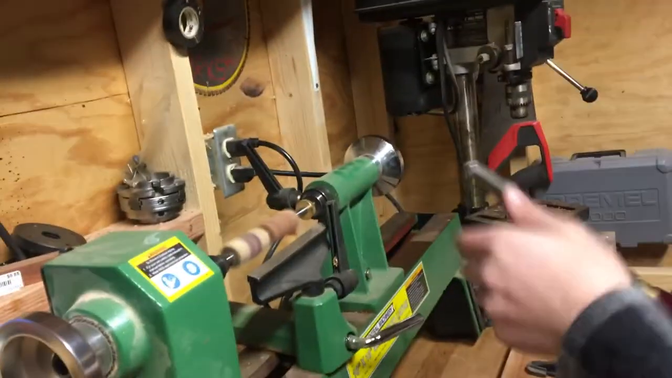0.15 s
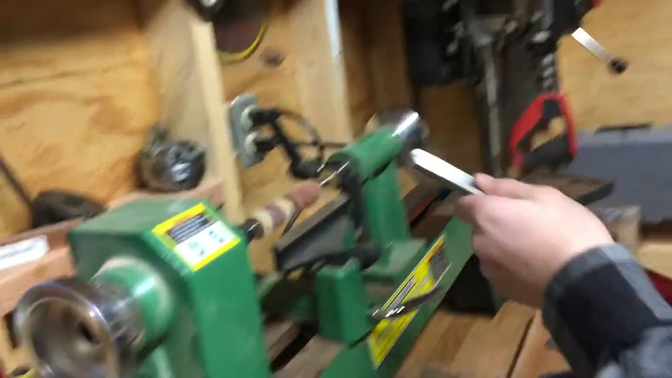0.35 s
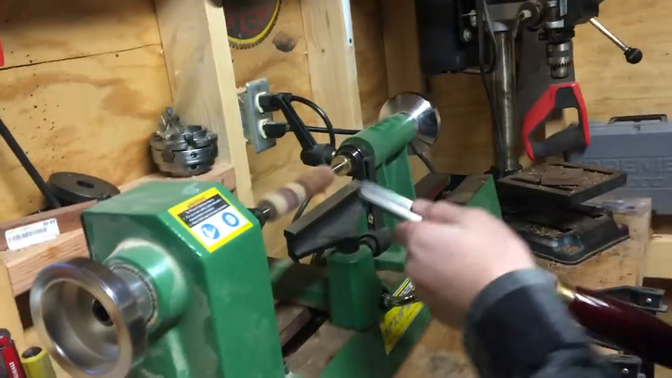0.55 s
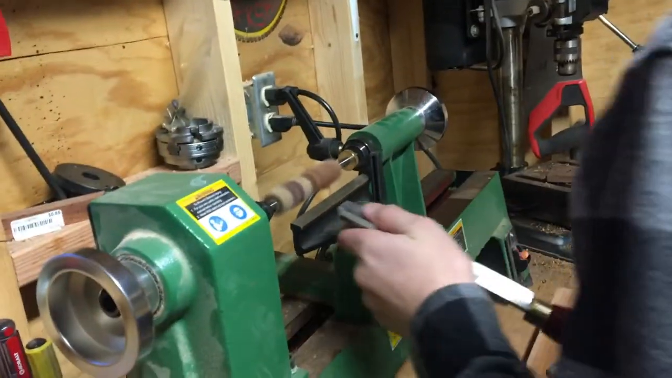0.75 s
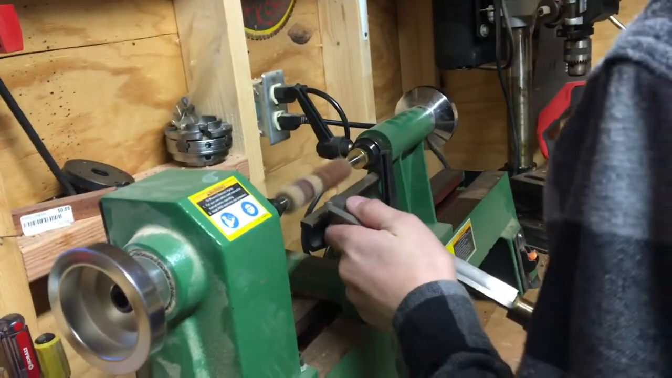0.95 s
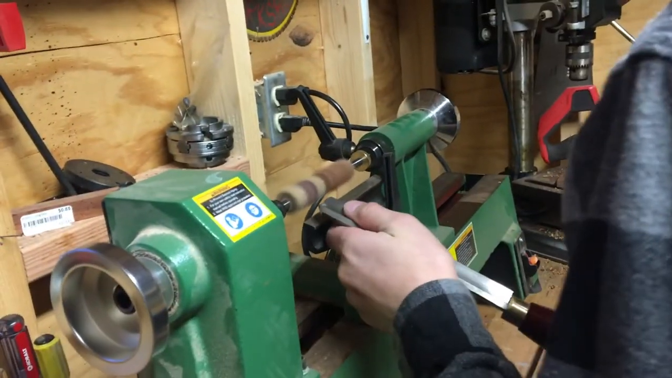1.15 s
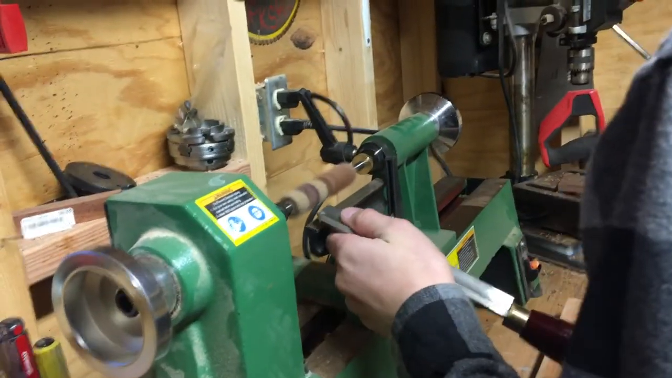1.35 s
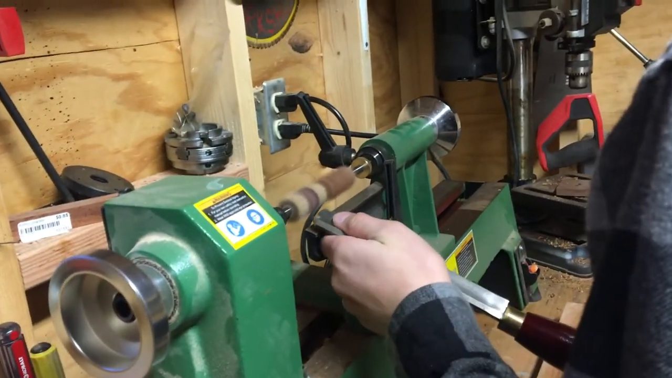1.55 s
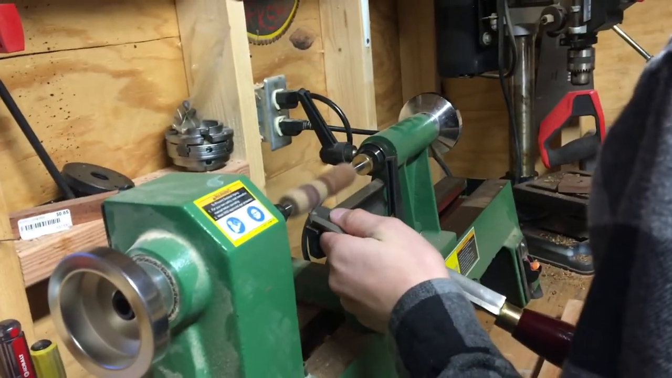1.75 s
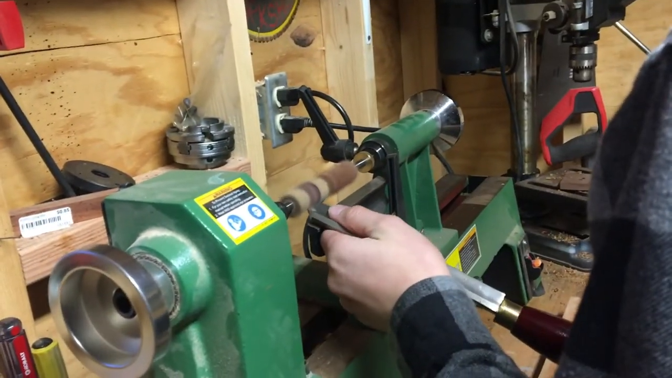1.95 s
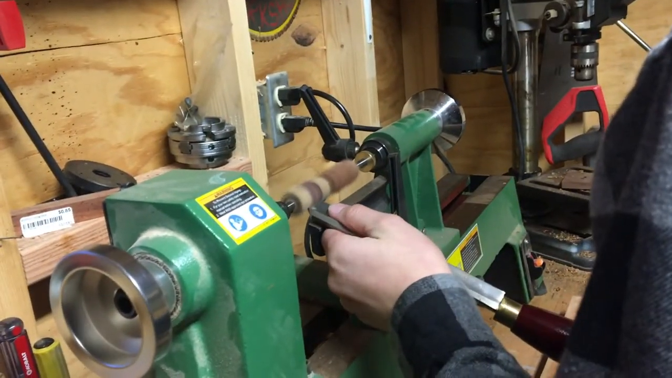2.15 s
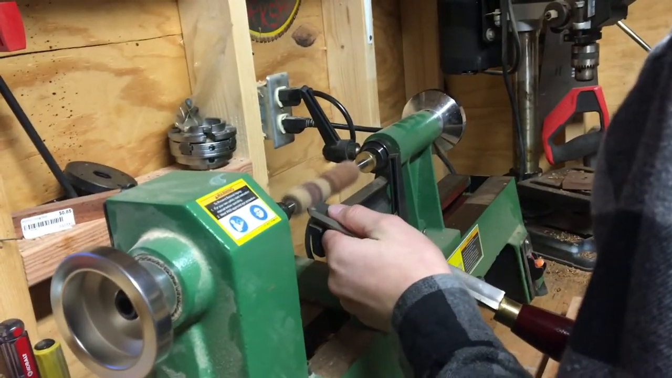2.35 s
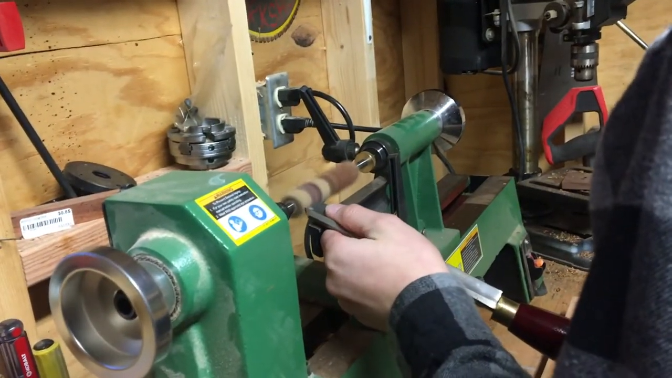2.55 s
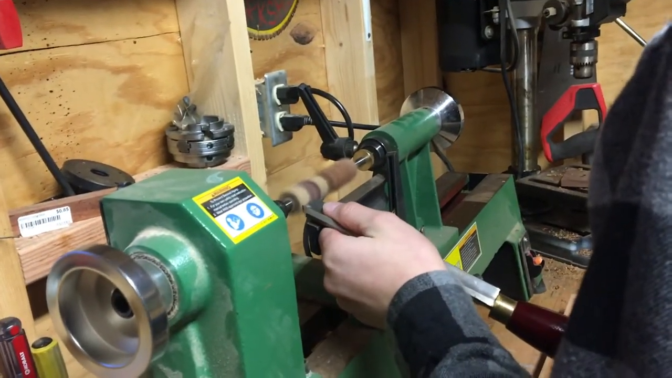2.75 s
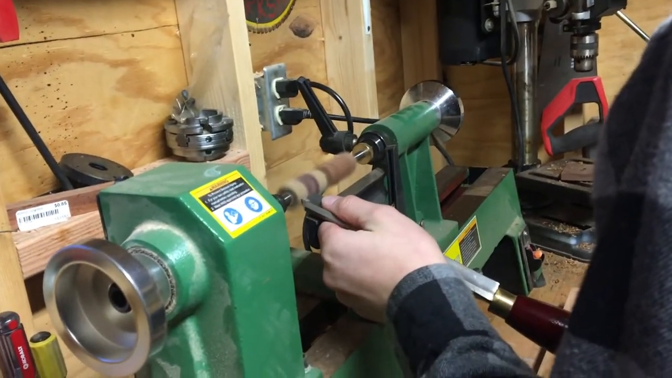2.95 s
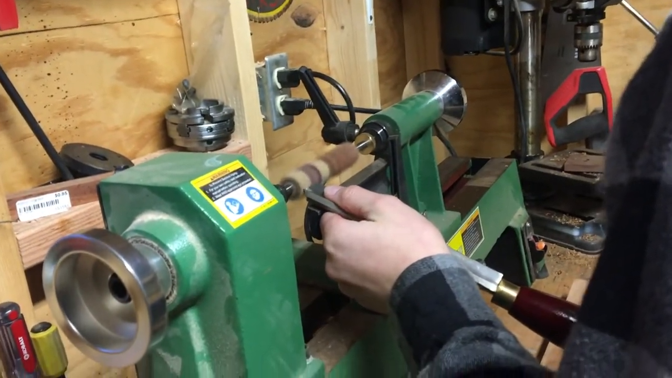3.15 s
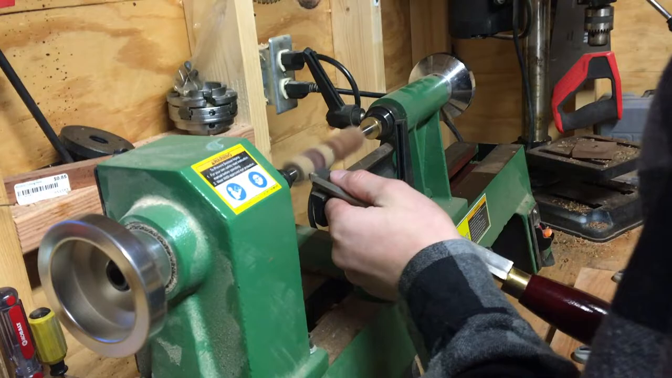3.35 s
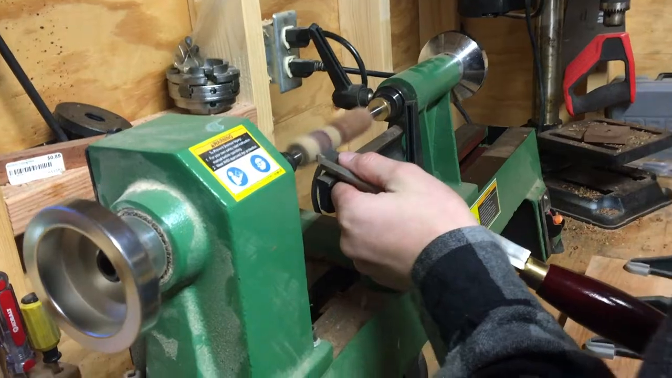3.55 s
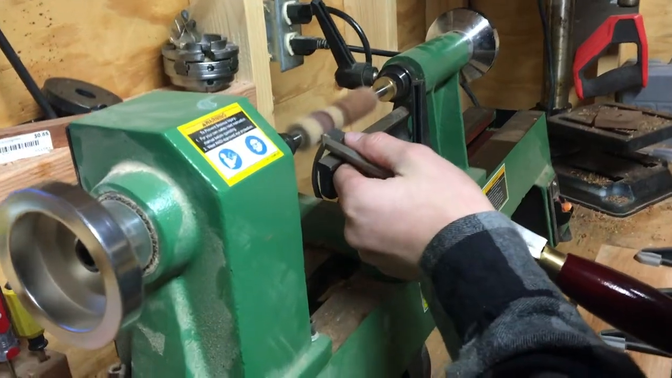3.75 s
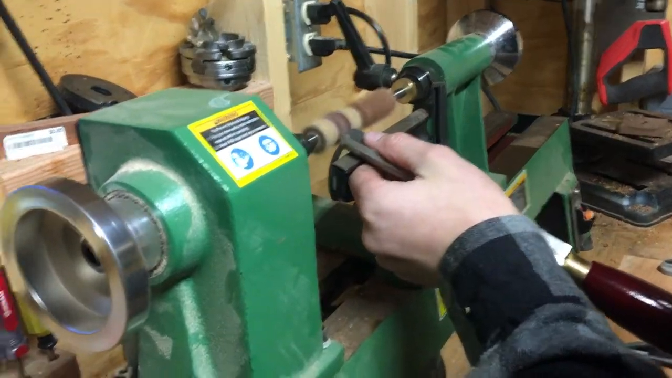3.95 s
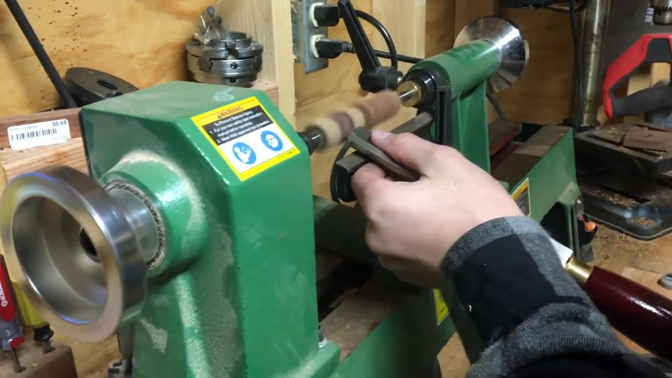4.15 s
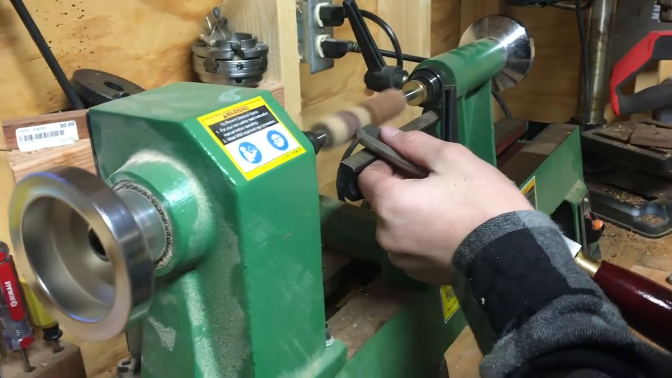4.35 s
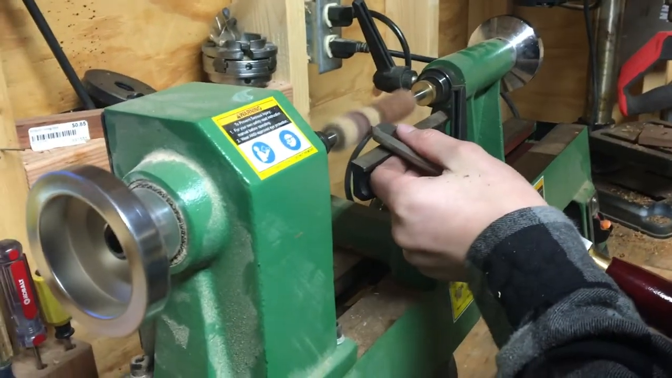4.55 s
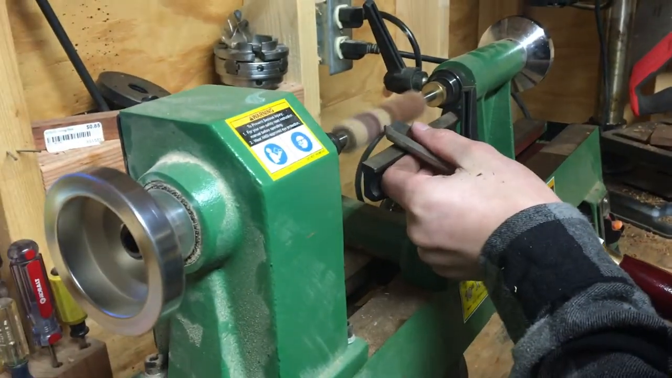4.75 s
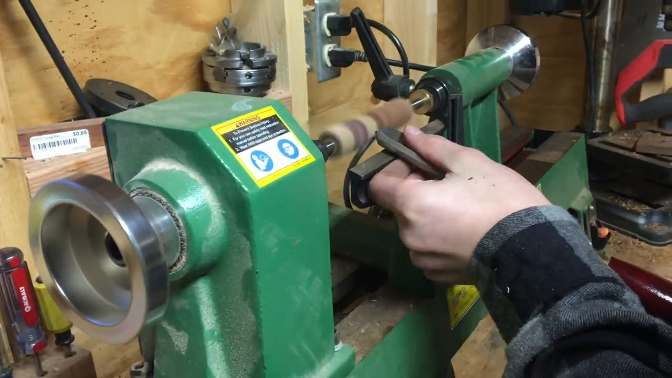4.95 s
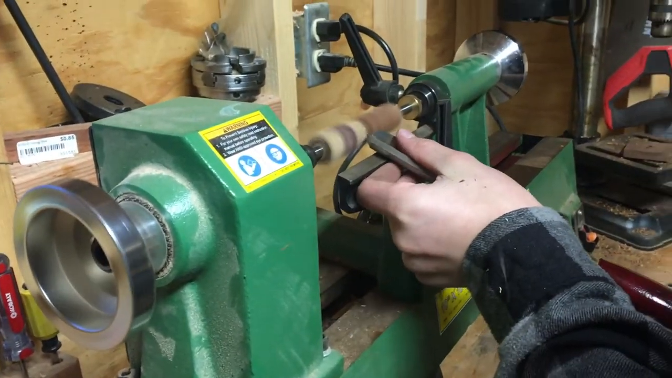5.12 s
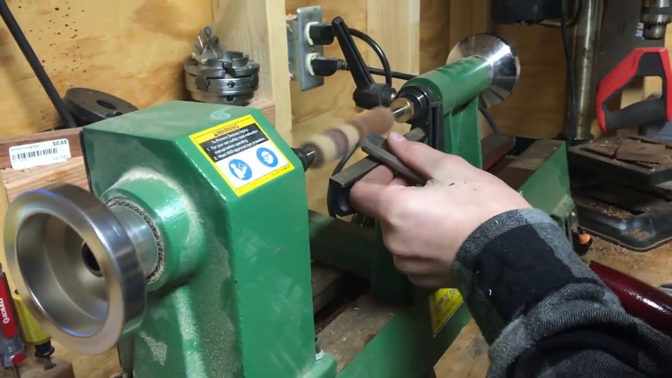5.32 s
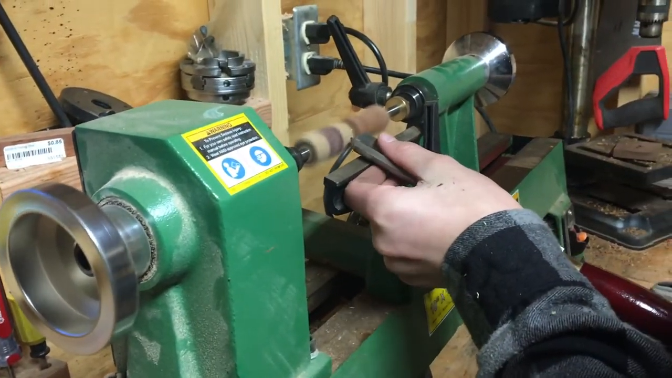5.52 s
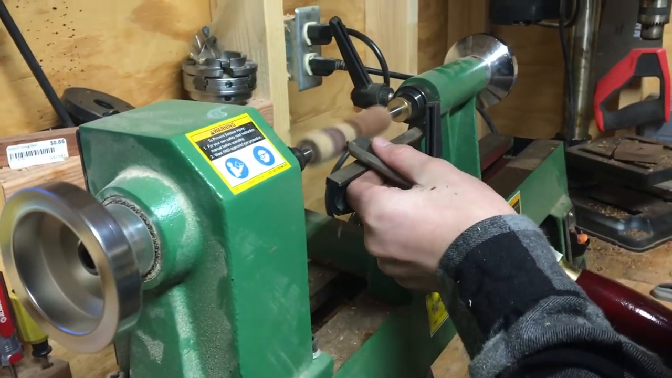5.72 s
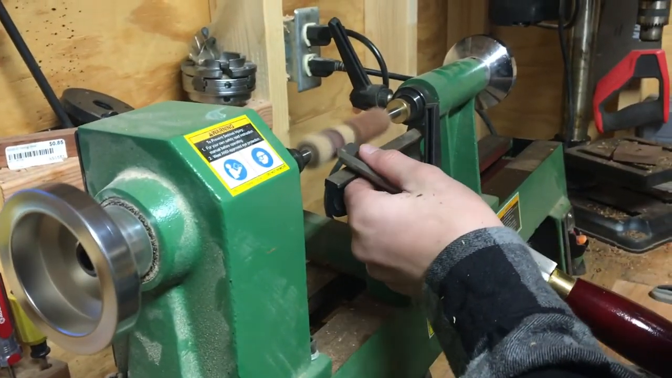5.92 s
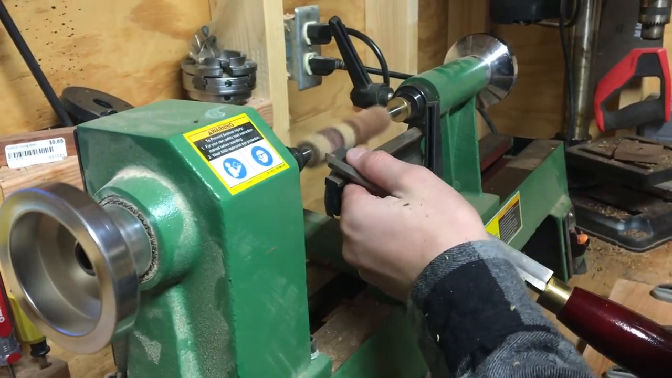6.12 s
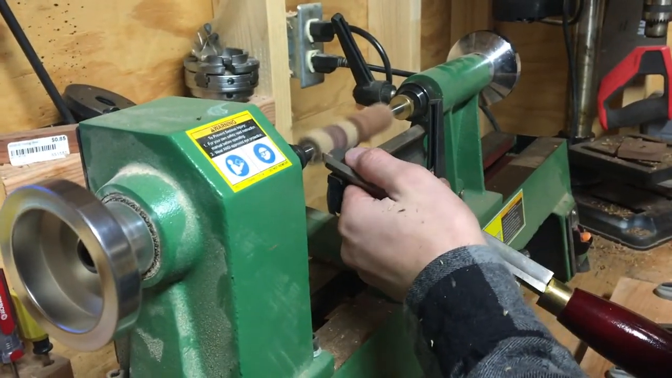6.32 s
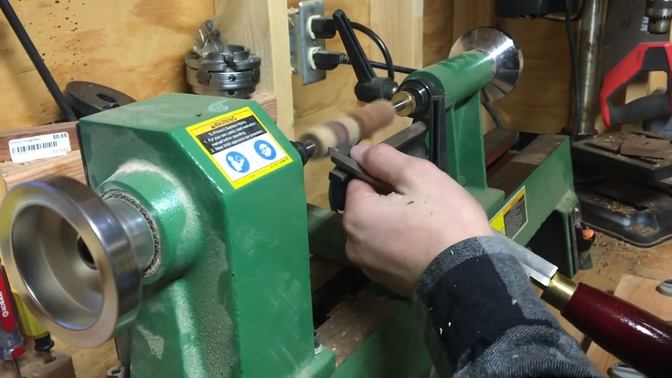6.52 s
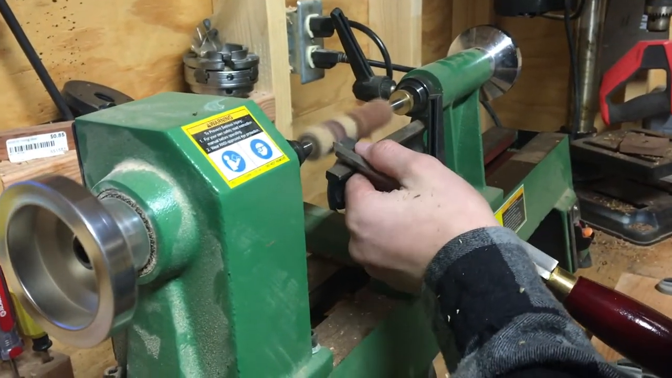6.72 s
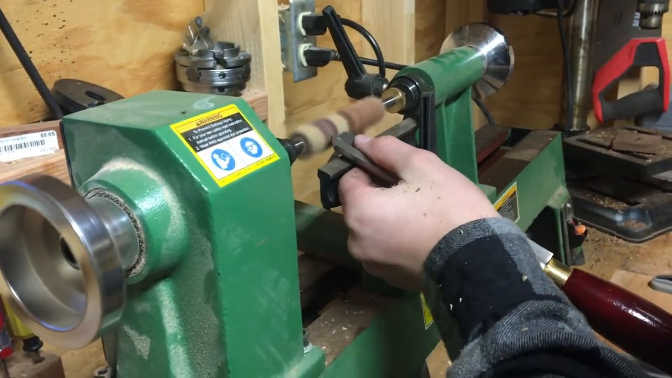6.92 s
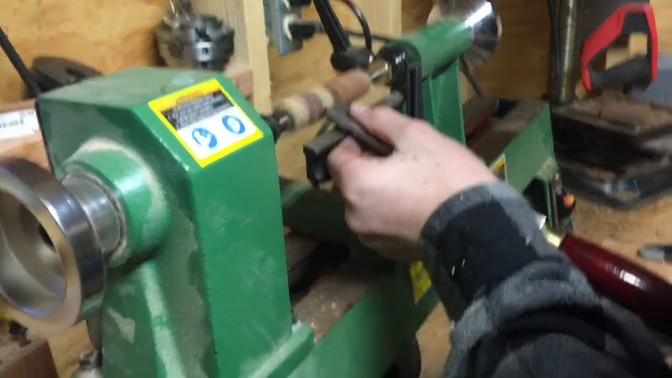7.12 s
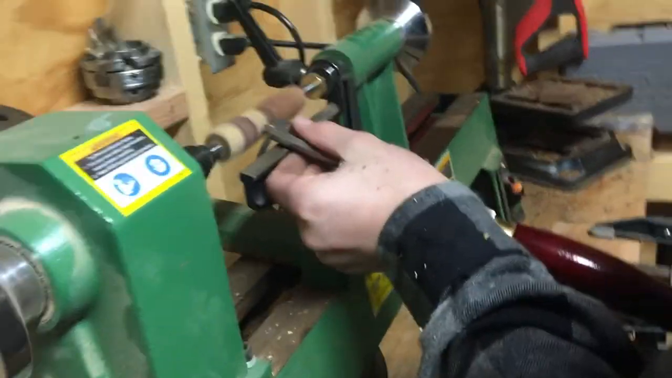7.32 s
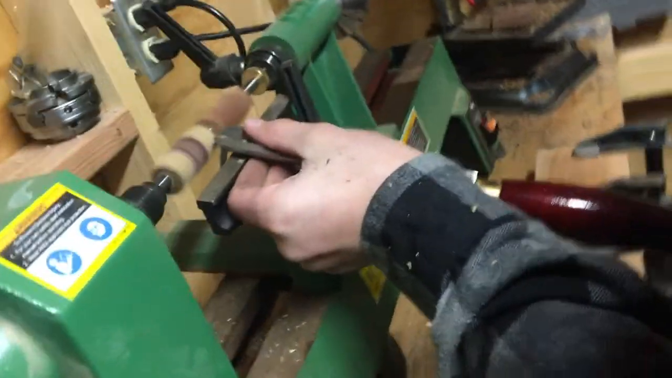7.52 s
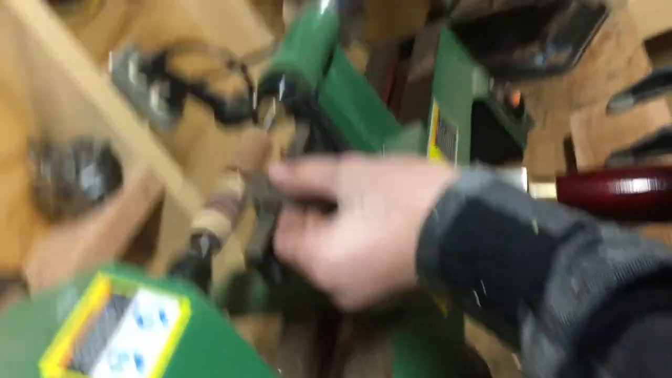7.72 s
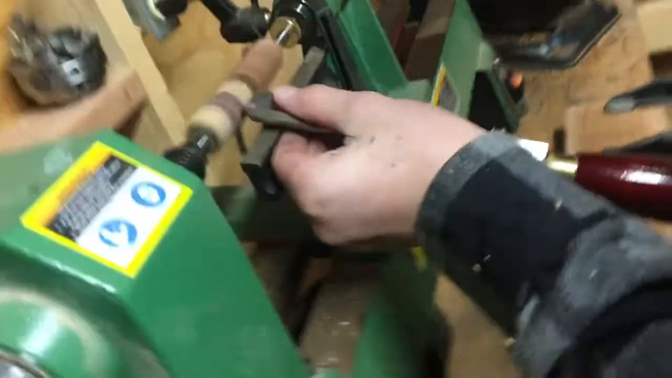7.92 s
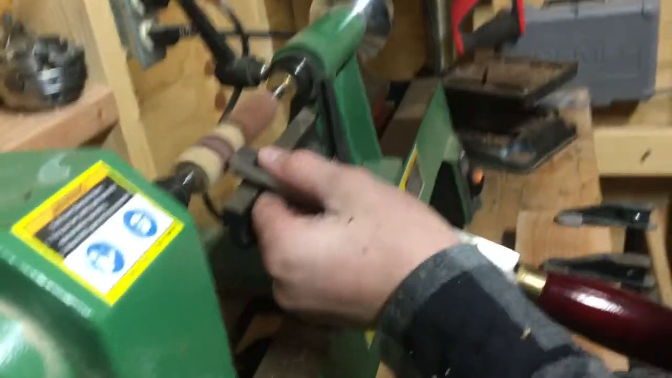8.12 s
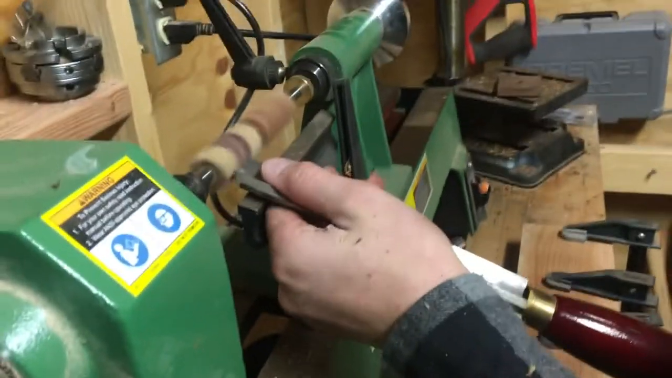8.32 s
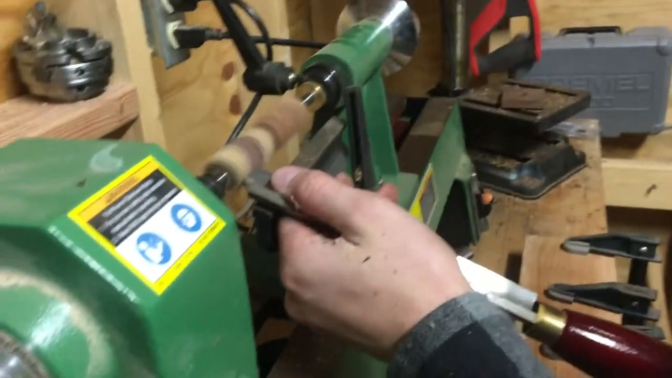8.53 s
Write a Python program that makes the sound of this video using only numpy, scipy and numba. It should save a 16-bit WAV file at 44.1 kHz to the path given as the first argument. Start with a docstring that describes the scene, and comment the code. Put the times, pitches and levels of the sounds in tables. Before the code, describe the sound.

A small wood lathe hums steadily, close to the microphone in a small workshop, with a thin motor whine and soft bearing noise. A dull, low bench bump comes at about 0.5 seconds. From 2.7 seconds a hand-held gouge catches the spinning wood in a stutter of short, sharp ticks, lasting until about 3.9. At 3.3 seconds everything switches to double speed, and the hum jumps an octave. From about 3.4 seconds the gouge cuts in push after push: a rough, rasping hiss of tearing chips over a fast, buzzing rattle from the tool rest and lathe body. The scraping swells and dips irregularly, with brief ringing tones as the tool shifts. It continues to the end, brightest around 8.3 seconds, followed by another dull bump and one last sharp catch at about 8.6. The motor hums underneath throughout.

```python
"""A small wood lathe hums in a workshop, close to a single microphone. A hand-held gouge catches the
spinning blank a few times, then cuts: push after push, the edge meets two high spots on every turn,
knocks the tool rest, rasps over the grain and tears chips. The tailstock buzzes along; the hand and a
wall close behind echo the cut. From FAST_FROM_S on, all plays at double speed, an octave higher."""
import sys
import numpy as np
from scipy import signal
from scipy.fft import rfft, irfft
from scipy.io import wavfile
from scipy.ndimage import map_coordinates
from numba import njit

SR = 44100
rng = np.random.default_rng(int(sys.argv[2]) if len(sys.argv) > 2 else 0)


def file_out(sig):
    """Save sig as 16-bit WAV at sys.argv[1]."""
    # one column per channel
    cols = np.atleast_2d(sig).T
    # limit, then scale
    lim = np.clip(cols, -1, 1)
    pcm = np.round(lim * 32767).astype(np.int16)
    wavfile.write(sys.argv[1], SR, pcm)


N = 382788

# Cues and push envelopes run in playing time; pitches, rings and echoes are given at normal speed.
FAST_FROM_S, SPINDLE_HZ, DRIVE_HZ = 3.277, 28.14, 151.1
SHOP_S = np.arange(2 * N - int(FAST_FROM_S * SR)) / SR  # time in the workshop
PLAY_S = np.minimum(SHOP_S, (SHOP_S + FAST_FROM_S) / 2)  # when the listener hears that moment
TURNS, SIZE = SPINDLE_HZ * SHOP_S, len(SHOP_S)

# Mains hum and spindle unbalance. Each row: frequency in Hz, level in dB.
HUM_TONES = [(28.14, -63.5), (84.42, -103), (119.91, -40.5), (239.83, -50), (359.74, -82)]
# Whine of the drive. Each row: multiple of DRIVE_HZ, level in dB.
DRIVE_HARMONICS = [(2, -66.5), (3, -60.5), (4, -62.5), (5, -54.5), (6, -51.5), (7, -59.5), (8, -60.5),
                   (9, -59.5)]
# Thin whistles of the motor. Each row: frequency in Hz, level in dB.
MOTOR_WHISTLES = [(1677, -60.5), (2635, -71.5), (3289, -64.5), (4005, -71)]
# Colour of the bearing noise. Each row: frequency in Hz, relative level in dB.
BEARING_SPECTRUM = [(20, -26), (42, -18), (70, 2.5), (170, -4.5), (350, -6), (600, -5.5), (850, -1.5),
                    (1150, -0.5), (1330, -1.5), (1480, -7.5), (2500, -8), (3500, -14), (4300, -21),
                    (5500, -28), (8000, -31.5), (12000, -31), (16000, -39)]
# Housing resonances rung by the bearings. Each row: frequency in Hz, width in Hz, lift in dB.
HOUSING_MODES = [(1104, 25, 9.8), (1270, 14, 3.7), (1855, 14, 9.8), (2475, 7.4, 11), (3340, 56, 11.6),
                 (3860, 76, 8.8)]
# Two separate low sounds. Each row: time in seconds, spindle thrum in dB, microphone handling in dB.
THRUM_AND_HANDLING = [(3.3, -60, -74), (3.9, -53, -69), (4.6, -54, -62), (5.3, -70, -79), (5.7, -51, -100),
                      (6.6, -52.5, -76), (7.9, -53, -59), (8.6, -44.5, -63)]
# Dull bumps against the bench. Each row: start in seconds, level in dB, pitch in Hz,
# swell time in seconds at normal speed, relative rattle level in dB, rattle frequency in Hz.
BENCH_BUMPS = [(0.521, -33, 68.6, 0.049, -8.5, 297), (8.385, -37, 73.6, 0.042, 5.5, 189)]

# Single catches of the edge. Each row: start in seconds, level in dB, treble against mids in dB.
EDGE_CATCHES = [(2.684, -38, -4), (2.7191, -21.5, -0.5), (2.755, -24, -4.5), (2.968, -43, 2.5),
                (3.0039, -23, -6.5), (3.073, -38, 2.5), (3.1093, -37, -2), (3.146, -30.5, -10),
                (3.181, -35, -9), (3.2154, -23, -6.5), (3.2518, -27.5, -9), (3.2832, -24.5, -14),
                (3.407, -20.5, -4.5), (3.4432, -23.5, -14), (3.532, -21.5, -5), (3.5497, -21.5, -1),
                (3.567, -37, -6), (3.585, -22.5, 4), (3.674, -21, -19), (3.727, -27, -6),
                (3.8692, -24, -16), (3.8878, -31, -9), (3.9055, -25, -4), (8.6138, -24, 0)]
# Colours of catches, rasp and chips. Each row: frequency in Hz, relative level in dB.
CATCH_SPECTRUM = [(80, -15), (280, -3), (420, 7.5), (600, -7.5), (850, 2), (1400, -1), (2200, -2.5),
                  (3600, 3), (5000, -4.5), (7500, -10.5), (11000, -10), (16000, -19)]
RASP_SPECTRUM = [(50, -13), (120, -2.5), (300, -7), (600, -11), (760, -3), (1150, -2.5), (1330, -15),
                 (1600, -5), (2400, -5.5), (3000, -15), (5000, -19.5)]
CHIP_SPECTRUM = [(300, -34), (1500, -5), (2400, -1), (3100, 3), (4400, 4), (5000, -4), (6400, -8),
                 (7500, -14), (9000, -18.5)]
# Resonances and hollows of blank and gouge. Each row: frequency in Hz, width in Hz, lift in dB.
GOUGE_MODES = [(716, 310, 4), (922, 39, 4.5), (1243, 77, 5), (1338, 81, -12), (1612, 490, 5.5),
               (3020, 49, 0), (3280, 240, 3.5), (4630, 690, 1.5), (6180, 530, 8), (6700, 600, 2),
               (8830, 550, 9)]
# Modes of lathe bed, tailstock and steel bevel. Each row: frequency in Hz, width in Hz, weight in dB.
BED_MODES = [(309.1, 1.9, -9), (364, 10.3, -1), (402.3, 1.4, 13), (552.5, 12, -8)]
TAILSTOCK_MODES = [(530, 15, 0.5), (703, 23, -3), (811, 35, 1), (898, 31, 2), (1105, 93, -13),
                   (1631, 26, -0.5), (1880, 13, 3), (2275, 17, -16), (2575, 27, -4)]
BEVEL_MODES = [(3000, 380, -1.5), (3270, 280, 1), (6170, 800, -13)]
# Modes of the tool rest; a firm grip favours the highest, a dipped tip the lowest. Each row: frequency
# in Hz, width in Hz, weight in dB held loosely, weight in dB held firmly, dB added when dipped.
REST_MODES = [(322.7, 32, -3, -30.5, 34), (367, 72, 15, -23.5, 0), (394.7, 42, 9.5, -8.5, 6),
              (440, 42.4, -33, 15.5, -7.5)]
# Rings of the blade. Each row: frequency in Hz, width in Hz, lift in dB held loosely, and held firmly.
BLADE_RINGS = [(562, 29, -21, 18), (782, 22, 11, 1), (1010, 34, 8, 1.5), (1083, 28, -3, -2.5),
               (1142, 37, 10, -11), (1427, 48, 10.5, 7), (1570, 41, 2, 0), (1862, 130, -6, 4.5),
               (2277, 21, 7, 7.5)]
# At some angles of the gouge one resonance sings out.
# Each row: start in seconds, length in seconds, frequency in Hz, width in Hz, lift in dB.
SINGING_RINGS = [(3.5, 0.84, 3720, 150, 8.5), (3.848, 0.74, 5100, 130, 10), (3.905, 0.6, 1890, 70, 8.5),
                 (4.655, 0.52, 2480, 110, 8.5), (5, 0.72, 1420, 260, 4.5), (4.59, 0.39, 4000, 440, 4.5),
                 (4.45, 0.7, 2080, 260, 3), (7.1, 0.5, 1850, 120, 2.5), (5.4, 0.49, 2140, 130, 6),
                 (5.7, 0.63, 3960, 400, 4), (6.06, 0.31, 710, 72, 12), (6.45, 0.37, 580, 94, 4),
                 (7.164, 0.76, 820, 190, 4), (7.097, 0.32, 2050, 400, 2), (6.85, 0.73, 6500, 220, 4),
                 (7.75, 0.3, 5940, 300, 10), (8.198, 0.34, 3050, 190, 6), (8.295, 0.56, 2670, 167, 5.5)]
# The hand's hold on the gouge. Each row: time in seconds, firmness 0-1, dip of the tip 0-1.
HAND_GRIP = [(3.5, 0.68, 0), (4.0, 0.74, 0), (4.7, 0.77, 0.14), (5.45, 0.99, 0.76), (5.84, 0.83, 0.5),
             (5.95, 0.79, 0.67), (6.1, 0.9, 0.8), (6.22, 0.68, 0.86), (6.32, 0.55, 0.29), (7.0, 0.53, 0),
             (7.2, 0.6, 0.05), (7.6, 1, 0), (8.03, 0.67, 0.2), (8.15, 0.43, 0)]
# Reflection off the moving hand. Each row: time in seconds, delay in ms, relative level in dB.
HAND_REFLECTION = [(3.4, 1.16, -6), (4.7, 1.22, -17), (5.15, 1.02, -18), (5.5, .97, -19), (5.65, 1.1, -22),
                   (6.1, 1.2, -17), (6.4, 1.2, -14), (6.8, 1.17, -27), (7.1, 1.03, -15), (7.6, 1.03, -8),
                   (7.9, 1.05, -24)]
# Places worked along the blank. Each row: start in seconds, angle of the first high spot in turns,
# its strength in dB, contact in turns, angle of the knock in turns, shaking of the bed in dB.
CUT_PLACES = [(0, .3, -25, 0.24, .6, -4.5), (3.91, 0.27, -3, 0.22, 0.57, 0.5),
              (4.471, 0.296, -1.5, 0.23, 0.4, -0.5), (5.4, 0.27, -2.5, 0.24, 0.39, 0.5),
              (6.228, 0.435, -2.5, 0.2, .72, 5), (7.2, 0.4, -0.5, 0.13, 0.81, 4),
              (7.781, 0.405, 0, 0.12, 0.62, 5)]
# Pushes of the gouge into the wood.
# Each row: start in seconds, length in seconds, then the drive of knock, rasp and chips in dB.
GOUGE_PUSHES = [(3.369, 0.041, -45, -38, -38.5), (3.5, 0.072, -41.5, -33.5, -37),
                (3.688, 0.12, -40.5, -33.5, -35.5), (3.837, 0.044, -36.5, -31, -31),
                (3.952, 0.5, -40, -36.5, -40), (4.082, 0.079, -44, -35, -33),
                (4.472, 0.093, -35.5, -35, -31.5), (4.638, 0.36, -36, -34, -39),
                (5.04, 0.079, -37, -32.5, -37), (5.373, 0.071, -37, -33.5, -35.5),
                (5.47, 0.43, -37.5, -38.5, -41.5), (5.607, 0.096, -34, -35.5, -31.5),
                (5.775, 0.26, -38.5, -35, -31), (6.045, 0.18, -36, -36.5, -29.5),
                (6.285, 0.079, -45, -35, -33.5), (6.468, 0.096, -42, -32.5, -33.5),
                (6.623, 0.13, -39.5, -32.5, -31.5), (6.756, 0.18, -45, -36, -34),
                (6.982, 0.18, -45, -35.5, -35), (7.103, 0.24, -42, -34.5, -37), (7.29, 0.22, -37, -33, -39),
                (7.61, 0.43, -38.5, -33.5, -39), (7.768, 0.1, -37.5, -29.5, -29),
                (8.038, 0.59, -48, -34.5, -32.5), (8.321, 0.12, -39.5, -29.5, -24.5),
                (8.454, 0.076, -44, -33.5, -27)]


def undb(db):
    """Decibels to gain."""
    return 10 ** (np.asarray(db) / 20)


def unit(x):
    """Scale to rms 1."""
    return x / np.sqrt(np.mean(x ** 2))


def curves(table):
    """Each column after the time as a control signal."""
    times, *columns = np.transpose(table)
    return [np.interp(PLAY_S, times, column) for column in columns]


def shop_index(s):
    """Workshop sample that is heard at playing time s."""
    return int((s + max(s - FAST_FROM_S, 0)) * SR)


def walk(rate_hz):
    """Slow random wander with a spread near 1."""
    knots = rng.standard_normal(1024)
    return 1.2 * np.interp(SHOP_S * rate_hz, np.arange(len(knots)), knots)


def colour(x, spectrum, peaks, size=16384):
    """Minimum-phase filter of unit power: a broad spectrum with resonances on top."""
    freqs = np.maximum(np.arange(size // 2 + 1) * SR / size, 1)
    hz, db = np.transpose(spectrum)
    broad_db = np.interp(np.log(freqs), np.log(hz), db)
    peaks_db = sum(lift / (1 + (2 * (freqs - centre) / width) ** 2) for centre, width, lift in peaks)
    cepstrum = irfft(np.log(undb(broad_db + peaks_db)))[:size // 2]
    cepstrum[0] = 0
    response = irfft(np.exp(rfft(2 * cepstrum, size)))[:size // 2]
    return signal.oaconvolve(x, response / np.linalg.norm(response))[:len(x)]


@njit
def sweep(x, hz, width):
    """State-variable band-pass, gain 1 at the centre."""
    out, band_state, low_state = np.empty(len(x)), 0., 0.
    for i in range(len(x)):
        tuning, damping = np.tan(np.pi * hz[i] / SR), width[i] / hz[i]
        band = (band_state + tuning * (x[i] + 1e-18 - low_state)) / (1 + tuning * (tuning + damping))
        band_state = 2 * band - band_state
        low_state += 2 * tuning * band
        out[i] = damping * band
    return out


def resonate(x, hz, width):
    """Band-pass whose centre and width may move."""
    return sweep(x, hz * np.ones(len(x)), width * np.ones(len(x)))


def resonate_twice(x, hz, width):
    """Two band-passes in a row, for steeper skirts."""
    return resonate(resonate(x, hz, width), hz, width)


def surface(renewal):
    """Roughness round a turning part: it comes back on each turn, with a share of it renewed."""
    per_turn = int(SR / SPINDLE_HZ)
    fresh = rng.standard_normal((512, per_turn))
    spectra = rfft(signal.lfilter([1], [1, renewal - 1], fresh, axis=0)[::-1])
    laps = irfft(spectra / np.abs(spectra), per_turn)  # flat: no multiple of the turn stands out
    return unit(laps.ravel()[(TURNS * per_turn).astype(int)])


def workshop(x, wall_db, tail_db, wall_s=0.0093, t60_s=0.26, build_s=0.009, dull_hz=3500):
    """At the microphone: direct sound, a duller slap off the wall behind, a short diffuse tail."""
    t = np.arange(SR // 2) / SR
    echoes = rng.standard_normal(len(t)) * np.exp(-np.log(1000) * t / t60_s) * (1 - np.exp(-t / build_s))
    echoes *= undb(tail_db) / np.linalg.norm(echoes)
    echoes[int(wall_s * SR)] += undb(wall_db)
    response = signal.lfilter(*signal.butter(1, dull_hz, fs=SR), echoes)
    response[0] += 1
    return signal.oaconvolve(x, response / np.linalg.norm(response))[:len(x)]


def handling():
    """A low rumble of the microphone being handled."""
    _, rumble_db = curves(THRUM_AND_HANDLING)
    return undb(rumble_db) * unit(resonate_twice(rng.standard_normal(SIZE), hz=52, width=22))


def motor(waver=0.00092, flutter_db=-0.04, rolling_db=-52, hiss_db=-48):
    """Steady hum, a wavering drive whine and bearing noise that partly repeats with the spindle."""
    hum = sum(undb(db) * np.sin(2 * np.pi * (hz * SHOP_S + rng.random())) for hz, db in HUM_TONES)
    clock = np.cumsum(1 + waver * walk(5)) / SR
    tones = [(multiple * DRIVE_HZ, db) for multiple, db in DRIVE_HARMONICS] + list(MOTOR_WHISTLES)
    whine = sum(undb(db + flutter_db * walk(17)) * np.sin(2 * np.pi * (hz * clock + rng.random()))
                for hz, db in tones)
    rolling = undb(rolling_db) * surface(renewal=0.028) + undb(hiss_db) * rng.standard_normal(SIZE)
    return np.sqrt(2) * (hum + whine) + colour(rolling, BEARING_SPECTRUM, HOUSING_MODES)


def thrum(waver_db=1.5):
    """The spindle thrums three times a turn under load."""
    thrum_db, _ = curves(THRUM_AND_HANDLING)
    return undb(thrum_db + waver_db * walk(3.2)) * np.sqrt(2) * np.sin(2 * np.pi * 3 * TURNS)


def bench_bumps():
    """The bumped bench swells into a low boom, with a little dull rattle."""
    out, t = np.zeros(SIZE), np.arange(SR // 2) / SR
    for start, db, hz, swell_s, rattle_db, rattle_hz in BENCH_BUMPS:
        band = signal.butter(4, [rattle_hz / 2, rattle_hz * 1.16], "band", fs=SR, output="sos")
        rattle = unit(signal.sosfilt(band, rng.standard_normal(len(t)))) * np.exp(-t / swell_s)
        swell = t / swell_s * np.exp((1 - (t / swell_s) ** 2) / 2)
        boom = swell * np.sin(2 * np.pi * hz * t)
        out[shop_index(start):][:len(t)] += undb(db) * (boom + undb(rattle_db) * rattle)
    return out


def sleeve(at_s=0.63, fade_s=0.063, db=-65, band_hz=(5500, 14000)):
    """Cloth rustles faintly as the arm brings the gouge to the rest."""
    band = signal.butter(2, band_hz, "band", fs=SR, output="sos")
    rustle = unit(signal.sosfilt(band, rng.standard_normal(SIZE)))
    return undb(db) * np.exp(-np.abs(PLAY_S - at_s) / fade_s) * rustle


def catches(length_s=0.0084, entry_s=0.0014, gain_db=-2, treble_hz=3000):
    """The edge snags a high spot: fibres tear evenly for as long as it passes."""
    out, t = np.zeros(SIZE), np.arange(SR // 20) / SR
    highs = signal.butter(1, treble_hz, "high", fs=SR)
    burst = (1 - np.exp(-t / entry_s)) * np.exp(-(t / length_s) ** 4)
    for start, db, treble_db in EDGE_CATCHES:
        tear = rng.standard_normal(len(t)) * burst
        tear += (undb(treble_db) - 1) * signal.lfilter(*highs, tear)
        out[shop_index(start):][:len(t)] += undb(db + gain_db) * tear
    return colour(out, CATCH_SPECTRUM, GOUGE_MODES)


def near_reflections(x, headstock_ms=2.67, headstock_db=-14):
    """Reflections off hand and headstock notch the sound; the hand's notches slide as it moves."""
    hand_ms, hand_db = curves(HAND_REFLECTION)
    delayed = lambda ms: map_coordinates(x, [np.arange(SIZE) - ms * SR / 1000], order=2)
    return x + undb(hand_db) * delayed(hand_ms) + undb(headstock_db) * delayed(headstock_ms)


def pressure(levels_db, ride_db, release_s, fade_db_per_s=0, attack_s=0.034, ride_from_s=3.39):
    """Each push swells, holds and lets go; in between, the bevel rides lightly on the wood."""
    gain = undb(ride_db) * (PLAY_S > ride_from_s)
    for (start, length, *_), db in zip(GOUGE_PUSHES, levels_db):
        span = slice(shop_index(start), shop_index(start + 1))
        age = PLAY_S[span] - start
        shape = np.minimum(age / attack_s, 1) * np.exp(-np.maximum(age - length, 0) / release_s)
        gain[span] = np.maximum(gain[span], shape * undb(db - fade_db_per_s * age))
    return gain


def bite(angle, first_db, contact_turns, second_db=2, spacing_turns=0.26):
    """Force over one turn: the edge digs quickly into the first high spot, more softly into the next."""
    dig = lambda turns, entry: (1 - np.exp(-turns / entry)) * np.exp(-(turns / contact_turns) ** 2)
    first = dig(angle, entry=0.0022)
    second = dig(np.maximum(angle - spacing_turns, 0), entry=0.0083)
    return undb(first_db) * first + undb(second_db) * second


def tailstock(blows, gain_db=-6):
    """Struck through the blank, the tailstock rings on from knock to knock: a pitched buzz."""
    rings = sum(undb(db) * resonate_twice(blows, hz, 2 * width) for hz, width, db in TAILSTOCK_MODES)
    return undb(gain_db) * unit(rings)


def bevel(friction, gain_db=-15, waver_db=2.45):
    """The steel bevel chirps faintly wherever it touches the wood."""
    chirp = sum(undb(db) * resonate_twice(friction, hz, width) for hz, width, db in BEVEL_MODES)
    return undb(gain_db + waver_db * walk(1.504)) * unit(chirp)


def rest_and_bed(blows, grain, firmness, dip, bed_db, rest_db=11):
    """Blows and dragging grain ring tool rest and bed; the grip shares out the rest's modes."""
    force = unit(blows) + .23 * grain
    shares = np.array([undb(loose + (firm - loose) * firmness + dipped * dip)
                       for _, _, loose, firm, dipped in REST_MODES])
    shares /= np.linalg.norm(shares, axis=0)
    rest = sum(share * resonate_twice(force, hz, width)
               for share, (hz, width, *_) in zip(shares, REST_MODES))
    bed = sum(undb(db) * resonate(force, hz, width) for hz, width, db in BED_MODES)
    return unit(undb(rest_db) * rest + undb(bed_db) * bed)


def blade(x, firmness, waver_db=1.3, move_hz=3.5, drift=0.012, swell_s=0.097, gain_db=-4.5):
    """The grip picks the blade's rings; they wander as the hand moves, and at times one sings out."""
    for hz, width, loose, firm in BLADE_RINGS:
        lift_db = loose + (firm - loose) * firmness + waver_db * walk(move_hz)
        x = x + (undb(lift_db) - 1) * resonate(x, hz * np.exp(drift * walk(move_hz)), width)
    for start, length, hz, width, db in SINGING_RINGS:
        span = slice(shop_index(start), shop_index(start + length))
        age = PLAY_S[span] - start
        swell = np.clip(np.minimum(age, length - age) / swell_s, 0, 1)
        x[span] += (undb(db * swell) - 1) * resonate(x[span], hz, width)
    return undb(gain_db) * x


def chips(touch, depth, size_db=2.2, depth_db=2.6):
    """Chips of random size snap off, louder on the turns that bite deeper."""
    sizes = np.minimum(rng.exponential(size=SIZE // 16 + 1), 3.5)
    snap_db = size_db * np.repeat(sizes, 16)[:SIZE] + depth_db * depth
    return unit(rng.standard_normal(SIZE) * undb(snap_db) * touch)


def rasp(grain, force, depth, blows, drag=.32, depth_db=1.5, chatter=0.055):
    """The edge rubs the grain, lightly between high spots; each blow adds a regular chatter."""
    rub = unit(grain * (force + drag) * undb(depth_db * depth))
    return unit(rub + chatter * unit(blows))


def cutting(knock_scatter_db=2, fresh_grain=.24, chip_drag=0.04, rasp_lag_turns=0.05, rasp_stretch=1.15):
    """On every turn the gouge bites, a little deeper or shallower; returns the knock and the scrape."""
    _, _, knock_db, rasp_db, chips_db = np.transpose(GOUGE_PUSHES)
    firmness, dip = curves(HAND_GRIP)
    place = np.searchsorted([row[0] for row in CUT_PLACES[1:]], PLAY_S)
    _, spot_angle, spot_db, contact, knock_angle, bed_db = np.array(CUT_PLACES)[place].T
    lap, angle = np.divmod(TURNS - spot_angle + 1, 1)
    depth = np.clip(rng.standard_normal(512), -1.4, 1.4)[lap.astype(int)]
    once_a_turn = np.maximum(np.diff(np.floor(TURNS - knock_angle), prepend=0), 0)
    blows = once_a_turn * undb(knock_scatter_db * depth)
    grain = surface(renewal=.07) + fresh_grain * rng.standard_normal(SIZE)
    touch = bite(angle, spot_db, contact) + chip_drag
    # the rasp builds a little after the edge has entered and lasts longer than the chips
    rasp_force = bite((angle - rasp_lag_turns) % 1, spot_db, contact * rasp_stretch)

    knock = rest_and_bed(blows, grain, firmness, dip, bed_db) + tailstock(blows)
    knock *= pressure(knock_db, ride_db=-50, release_s=0.1)
    rasping = rasp(grain, rasp_force, depth, blows) * pressure(rasp_db, ride_db=-49, release_s=0.074)
    tearing = chips(touch, depth)
    tearing *= pressure(chips_db, ride_db=-51.5, release_s=0.058, fade_db_per_s=-1)  # a slight rise
    chirp = bevel(grain * touch) * pressure(rasp_db, ride_db=-36, release_s=0.074)
    wood = colour(rasping, RASP_SPECTRUM, GOUGE_MODES) + colour(tearing, CHIP_SPECTRUM, GOUGE_MODES)
    return knock, chirp + blade(wood, firmness)


def speed_up(x):
    """Normal speed up to FAST_FROM_S, double speed after it."""
    split = int(FAST_FROM_S * SR)
    return np.concatenate([x[:split], signal.resample_poly(x[split:], 1, 2)])[:N]


def scene():
    """The lathe in its workshop, heard in mono from close by."""
    knock, scrape = cutting()
    cut = workshop(near_reflections(scrape), wall_db=-11, tail_db=-8)
    background = motor() + handling() + thrum() + bench_bumps() + sleeve()
    snags = workshop(catches(), wall_db=-3, tail_db=-4)
    return speed_up(background + snags + knock + cut)[None]


def record(dry):
    """The microphone chain cuts off steeply above 15.9 kHz."""
    return signal.sosfilt(signal.ellip(12, .2, 80, 15900, fs=SR, output="sos"), dry)


dry = scene()
out = record(dry)
file_out(out)
```